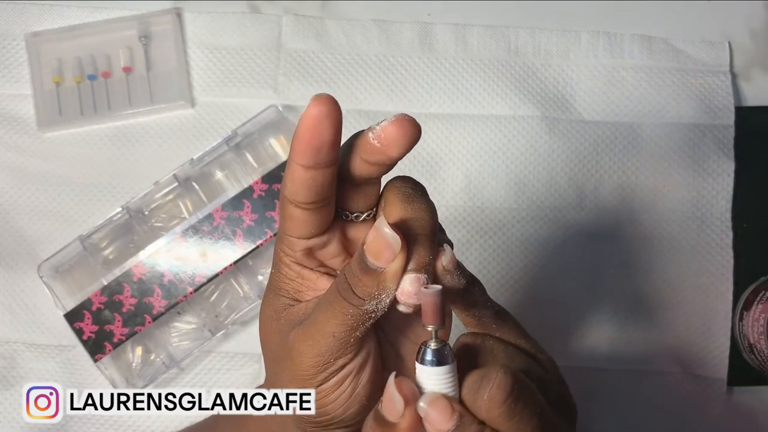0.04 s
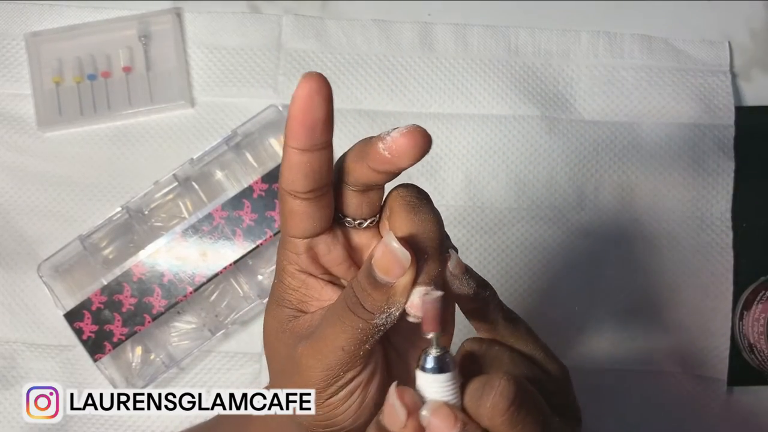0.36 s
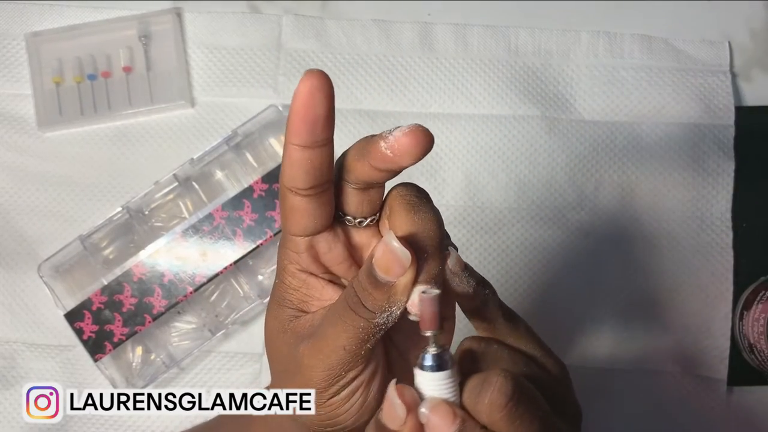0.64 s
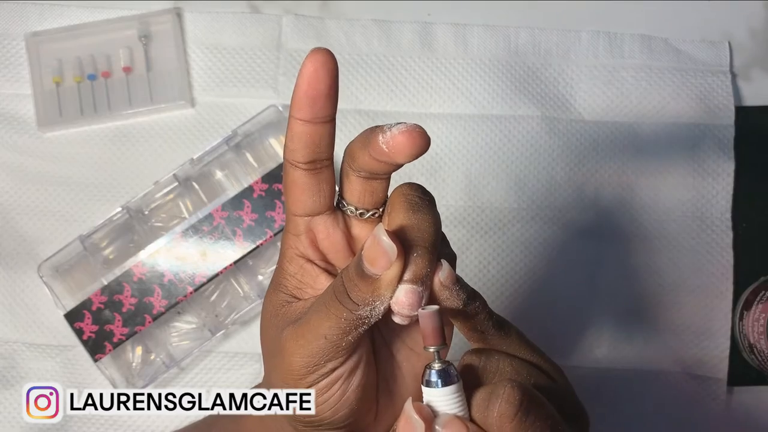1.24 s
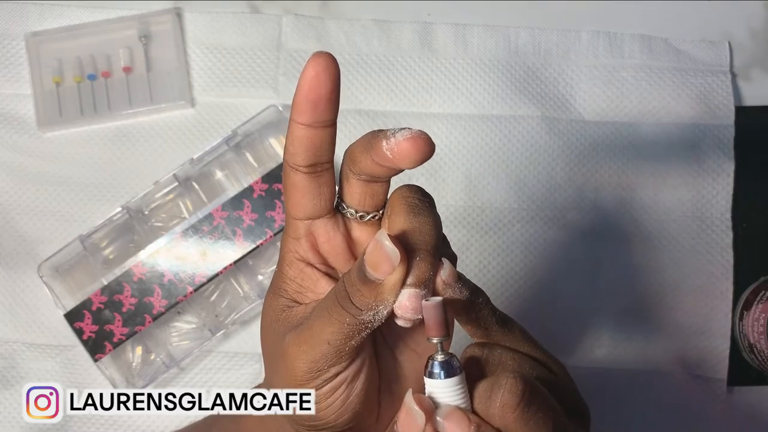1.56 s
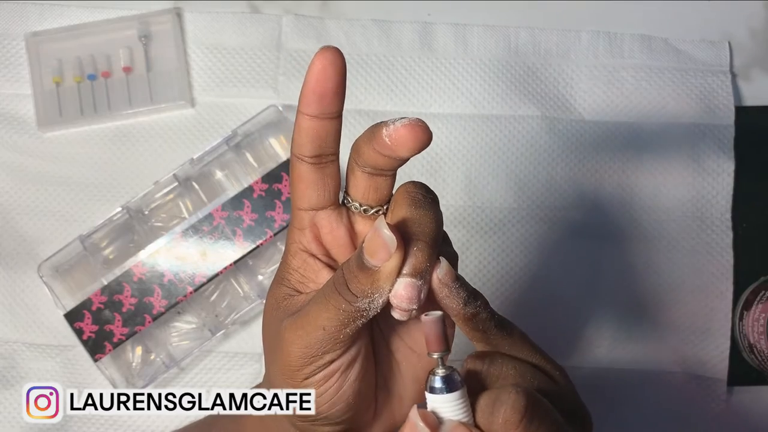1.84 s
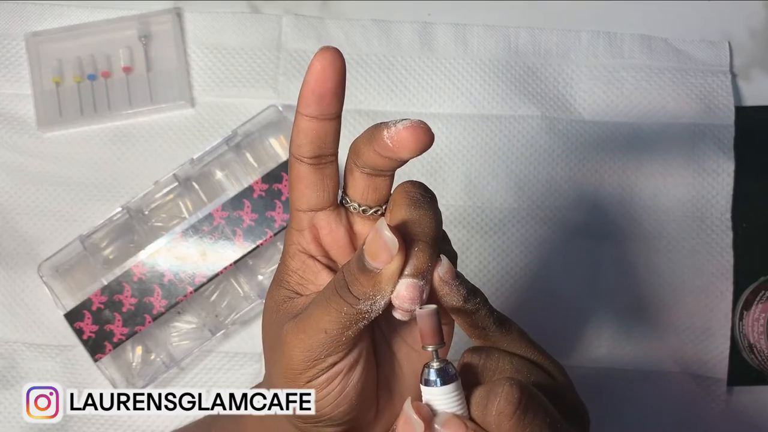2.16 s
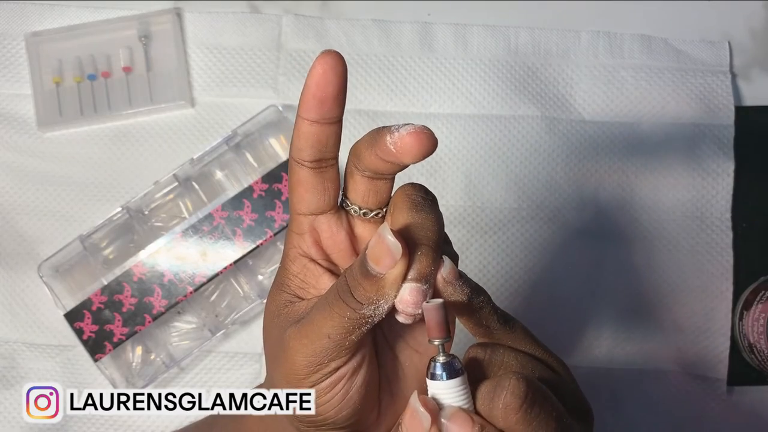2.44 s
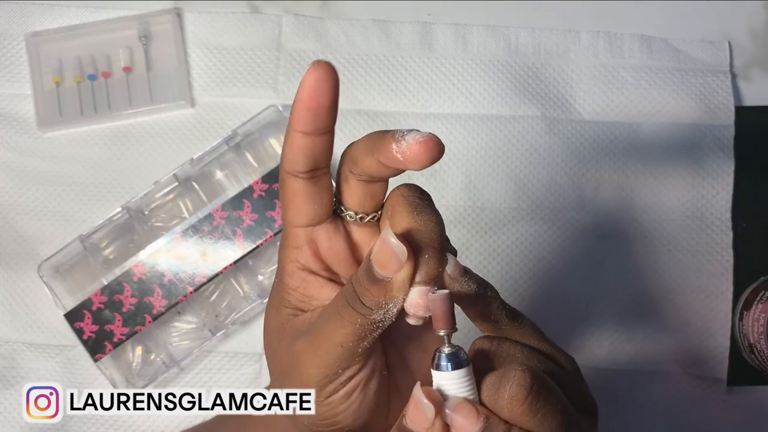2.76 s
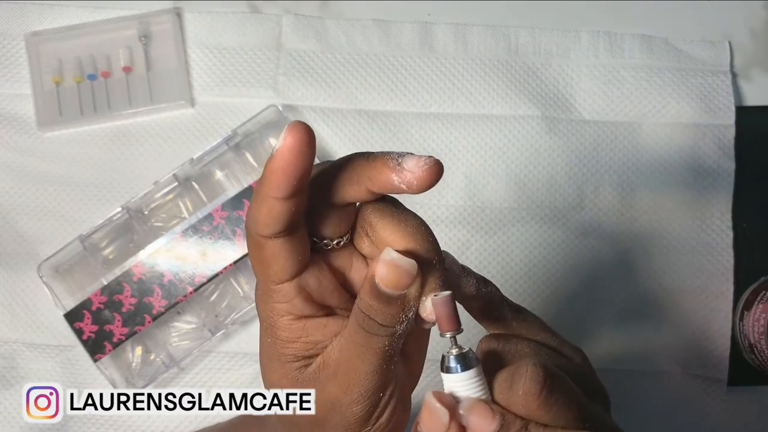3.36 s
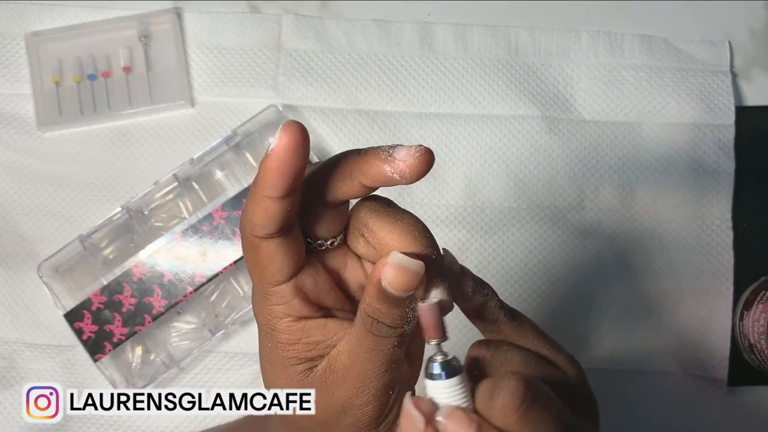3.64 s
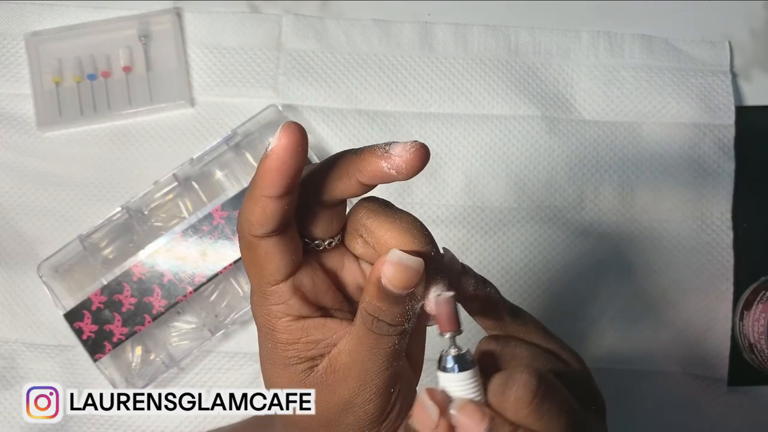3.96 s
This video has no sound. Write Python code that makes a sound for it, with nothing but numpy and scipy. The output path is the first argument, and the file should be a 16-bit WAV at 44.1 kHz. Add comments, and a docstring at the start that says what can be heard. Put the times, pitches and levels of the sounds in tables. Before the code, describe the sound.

A small electric nail drill sands a fingernail close to the microphone. Its rattling whir turns to a hissing rasp in several passes, slowing under load and catching with a few ticks, over a low room hum.

```python
"""A small electric nail drill files a fingernail close to the microphone, in a quiet humming room.
Grains of the sanding band strike the nail at random: the impacts hiss, excite the nail's resonances,
rub dully on the fingertip and, near the end, rasp on the free edge. The motor slows under load, and
now and then the band catches with a tick. With every turn the drive knocks through the handpiece's
housing and the bit rattles in its chuck."""
import sys
import numpy as np
from scipy import signal
from scipy.fft import rfft, irfft
from scipy.io import wavfile

SR = 44100
rng = np.random.default_rng(int(sys.argv[2]) if len(sys.argv) > 2 else 0)


def wav_out(sig):
    """Save sig, one row per channel (or a flat mono array), as 16-bit PCM at SR to the path in sys.argv[1]."""
    wavfile.write(sys.argv[1], SR, np.round(np.clip(np.atleast_2d(sig).T, -1, 1) * 32767).astype(np.int16))


N = 176400
T = np.arange(N) / SR
SIDES = np.array([[1], [-1]])  # left, right

# Hum of machines in the room: f/Hz, level/dB
HUM_TONES = [(26.7, -50), (69.9, -50), (116, -61), (120.3, -61.5), (174, -68.5), (270, -67.5)]
# Spectrum of the room's air noise: f/Hz, relative level/dB
AIR_SPECTRUM = [(18, -7), (40, -3.5), (58, 5.5), (82, -4), (110, -4), (160, -6), (220, -12.5), (340, -8.5),
                (420, -17.5), (600, -16), (900, -21.5), (1300, -25), (15000, -118)]
# Likeness of that noise on the two sides: f/Hz, left-right correlation
AIR_CORRELATION = [(50, .999), (125, 0.99), (250, 0.87), (500, 0.39), (800, 0.043), (1500, 0.077),
                   (8000, 0.29)]
# Left-right phase shift of the recorder's stereo processing, widening the drill: f/Hz, phase/rad
STEREO_PHASE = [(0, 0), (1600, 0), (2600, 1.1), (4000, 1.9), (4700, 3.14), (6870, 6.28), (9020, 9.42),
                (11020, 12.57), (13150, 15.71), (15200, 18.85), (16000, 18.9)]
# Balance of the drill: f/Hz, gain added on the left and taken from the right/dB
DRILL_BALANCE = [(300, 1.8), (800, 0.5), (1500, 0.9), (2700, -1.15), (4000, 0.03), (15000, -0.1)]

# Spindle speed, sagging under load: t/s, rotation frequency/Hz
SPINDLE_SPEED = [(0, 39.6), (.55, 41), (.76, 41.3), (.88, 47), (1.17, 51.5), (1.25, 43.3), (1.66, 39.4),
                 (1.82, 51), (2.05, 52.7), (2.42, 52), (2.6, 44), (3.0, 39.5), (3.25, 47), (3.55, 35.3),
                 (4, 42.4)]
# Work on the nail: t/s, relative grit level/dB, relative nail level/dB, handpiece level/dB
WORK_LEVELS = [(0, -68, -53.5, -58.5), (.08, -59, -52, -63), (.25, -71.5, -57, -53), (.31, -64, -51, -60),
               (.385, -63.5, -57, -89), (.43, -70.5, -52, -75), (.48, -66.5, -57.5, -53),
               (.60, -65.5, -55, -53), (.69, -63, -53, -58), (.81, -72, -59.5, -53),
               (.845, -83.5, -67.5, -60), (1.198, -83, -61.5, -58), (1.207, -61.5, -52.5, -70),
               (1.285, -63, -50, -57), (1.35, -66, -55, -61), (1.47, -63.5, -52.5, -59),
               (1.62, -66.5, -53.5, -60), (1.725, -66.5, -56, -59), (1.77, -84, -63, -57.5),
               (2.0, -79, -64, -57.5), (2.25, -80, -62.5, -57.5), (2.335, -70.5, -58, -55.5),
               (2.43, -83, -68, -60), (2.48, -70, -55, -54), (2.53, -60.5, -57, -55.5),
               (2.62, -67.5, -54, -53.5), (2.74, -65.5, -55, -57), (2.79, -61, -50.5, -58.5),
               (3.0, -66, -52, -55.5), (3.22, -76.5, -58.5, -54), (3.295, -82, -68, -58),
               (3.318, -73, -52, -52), (3.335, -75, -65, -58), (3.362, -79, -59.5, -55.5),
               (3.385, -69.5, -52, -54.5), (3.55, -65.5, -56.5, -57.5), (3.68, -65.5, -53.5, -52.5),
               (3.745, -63, -59, -54), (3.83, -63.5, -54.5, -54.5), (4, -65, -58, -51.5)]
# Response of the handpiece's housing: f/Hz, relative level/dB
HOUSING_SPECTRUM = [(400, -9.5), (1200, -16.5), (1730, -5.5), (2100, -2), (2600, -3), (3050, 5),
                    (3500, 0.5), (4500, -5), (5450, 4), (6700, -1.5), (8500, -18.5), (11200, -32),
                    (14200, -12), (15400, -18)]
# Rattle of the bit in its chuck: t/s, level/dB
CHUCK_LEVELS = [(0, -68), (.22, -63), (.4, -70), (.55, -64), (.95, -68), (1.195, -64), (1.215, -52),
                (1.27, -53), (1.34, -59), (1.85, -66.5), (2.42, -78), (2.52, -61), (2.68, -67), (2.83, -57),
                (3.03, -62.5), (3.22, -54.5), (3.28, -62.5), (3.42, -57.5), (4, -60)]
# Spectrum of that rattle: f/Hz, relative level/dB
CHUCK_SPECTRUM = [(500, -33), (1750, -1), (2500, -23), (3200, 0), (4600, -11), (5600, 6), (6300, 8),
                  (7000, -4), (8000, -15.5), (11000, -19), (15500, -31)]

# Catches of the band on the nail: t/s, relative peak level/dB, crack level re that peak/dB
BAND_CATCHES = [(1.2049, -33, -3), (2.514, -36, -6), (2.533, -32, -4), (2.785, -35, -20),
                (3.311, -33.5, -17), (3.316, -36, -15), (3.373, -38, -20)]
# Spectrum of a catch: f/Hz, relative level/dB
CATCH_SPECTRUM = [(300, -14), (1700, 6), (2600, 2), (5800, 18.5), (7500, 6), (9000, 5.5), (15500, -27)]
# Dull rubbing on the fingertip: t/s, level/dB
FINGERTIP_LEVELS = [(0, -57), (.25, -57), (.45, -62.5), (.62, -58), (.88, -66), (.98, -62), (1.18, -71.5),
                    (1.65, -60), (2.08, -62), (2.3, -78.5), (2.66, -58.5), (3.05, -62), (3.27, -72),
                    (3.42, -62), (4, -61)]
# Spectrum of that rubbing: f/Hz, relative level/dB
FINGERTIP_SPECTRUM = [(200, -15.5), (350, -7), (560, -6), (730, -14), (980, -8), (1300, -14.5),
                      (2500, -25.5), (8000, -67)]
# Shrill rasp on the nail's free edge: t/s, level/dB
EDGE_LEVELS = [(3.45, -94), (3.62, -66), (3.68, -52), (3.71, -60), (3.745, -50.5), (3.79, -67), (3.92, -55),
               (3.95, -47), (4, -47.5)]
# Spectrum of that rasp: f/Hz, relative level/dB
EDGE_SPECTRUM = [(1500, -12), (2700, -6.5), (3700, 1.5), (4600, -15), (7000, -7), (8400, -3), (10500, -4.5),
                 (12000, 0), (15700, -19)]
# Hiss of the abrasive: f/Hz, relative level/dB
GRIT_SPECTRUM = [(500, -7.5), (1200, 6.5), (2400, 0), (3700, 10.5), (4500, -1.5), (6500, 9.5), (7600, -1.5),
                 (8600, 2.5), (10000, 2), (11000, -2), (11900, 5), (14000, -0.5), (15700, 0.5)]
# Resonances of the nail: unshifted f/Hz, bandwidth/Hz, relative level/dB
NAIL_RESONANCES = [(1390, 366, -2.5), (1730, 160, 5), (2080, 136, 0.5), (2940, 460, -11), (3910, 170, -7.5),
                   (5850, 175, -3)]
# Shift of the resonances as the band moves over the nail: t/s, frequency ratio
NAIL_TUNING = [(0, 0.95), (.4, 0.98), (1.3, 0.98), (2.75, 0.999), (3.15, 0.99), (4, .95)]


def from_db(db):
    """Amplitude ratio of a level: a factor of ten per 20 dB."""
    return 10 ** (np.asarray(db) / 20)


def unit_rms(x):
    """Normalisation to unit mean power."""
    return x / np.sqrt(np.mean(x ** 2) + 1e-20)


def in_time(rows):
    """Linear interpolation of each column of a time table at every sample."""
    times, *columns = np.transpose(rows)
    return [np.interp(T, times, column) for column in columns]


def at_hz(points, hz):
    """Interpolation of a spectrum on a logarithmic frequency axis."""
    f, value = np.transpose(points)
    return np.interp(np.log(hz + 1), np.log(f), value)


def drift(corner_hz):
    """Slow random fluctuation: low-pass noise of unit rms."""
    step, settle = 40, 2000  # samples per noise value; values dropped while the filter settles
    r = np.exp(-2 * np.pi * corner_hz * step / SR)
    white = rng.standard_normal(N // step + settle + 2)
    slow = signal.lfilter([1], [1, -2 * r, r * r], white)[settle:]
    return np.interp(np.arange(N) / step, np.arange(len(slow)), unit_rms(slow))


def colour(x, spectrum, size=8192):
    """Minimum-phase filter of unit energy with the given spectrum."""
    magnitude = from_db(at_hz(spectrum, np.fft.rfftfreq(size, 1 / SR)))
    cepstrum = irfft(np.log(magnitude))
    cepstrum[1:size // 2] *= 2  # folding the cepstrum makes the response causal
    cepstrum[size // 2 + 1:] = 0
    response = irfft(np.exp(rfft(cepstrum)))
    return signal.fftconvolve(x, response / np.linalg.norm(response))[:N]


def resonance(x, hz, width_hz, block=256):
    """Damped two-pole resonator with unit peak gain and a moving centre frequency."""
    r = np.exp(-np.pi * width_hz / SR)
    b = np.array([1, 0, -1]) * (1 - r * r) / 2
    state, out = np.zeros(2), np.zeros(N)
    for i in range(0, N, block):
        a = [1, -2 * r * np.cos(2 * np.pi * hz[i] / SR), r * r]
        out[i:i + block], state = signal.lfilter(b, a, x[i:i + block], zi=state)
    return out


def air_noise(level_db=-51.5, leftward_db=0.4):
    """Partial coherence: the room's dull air noise is alike on both sides in the bass."""
    correlation = at_hz(AIR_CORRELATION, np.fft.rfftfreq(N, 1 / SR))
    mid, side = (rfft(colour(white, AIR_SPECTRUM)) for white in rng.standard_normal((2, N)))
    air = irfft(np.sqrt(1 + correlation) * mid + np.sqrt(1 - correlation) * side * SIDES, N)
    return from_db(level_db + leftward_db * SIDES) * unit_rms(air)


def hum_tone(hz, db, waver=0.15):
    """Slow random modulation of amplitude and phase makes a sinusoid waver."""
    amplitude = from_db(db) * np.sqrt(2) * (1 + waver * drift(1.9))
    phase = 2 * np.pi * (hz * T + rng.random()) + waver * drift(1.6)
    return amplitude * np.sin(phase)


def machine_hum(beat_depth=0.48, beat_top_s=0.29, beat_period_s=0.467):
    """Superposition of low machine tones; amplitude modulation gives the clearest a slow beat."""
    beat = 1 + beat_depth * np.cos(2 * np.pi * (T - beat_top_s) / beat_period_s)
    return sum(hum_tone(hz, db) for hz, db in HUM_TONES) + beat * hum_tone(hz=235.5, db=-59)


def stereo_image(direct, scattered, echo_db=-14, t60_s=0.24):
    """Left-right phase shift: the recorder's stereo processing widens the drill and its reflections."""
    t, hz = T[:SR // 4], np.fft.rfftfreq(N, 1 / SR)
    tails = rng.standard_normal((2, len(t))) * from_db(-60 * t / t60_s)
    tails /= np.linalg.norm(tails, axis=1, keepdims=True)
    reflections = from_db(echo_db) * signal.fftconvolve(direct[None], tails, axes=1)[:, :N]
    mid, side = rfft(direct + np.array([scattered, -scattered]) + reflections)
    half_shift = np.interp(hz, *np.transpose(STEREO_PHASE)) / 2
    channels = mid * np.cos(half_shift) + 1j * side * np.sin(half_shift) * SIDES
    return irfft(channels * from_db(at_hz(DRILL_BALANCE, hz) * SIDES), N)


def sample_at(turn, turns):
    """Inverse of the rotation: the sample at which the spindle reaches a given turn."""
    return np.interp(turn, turns, np.arange(N)).astype(int)


def eccentricity(turns, swing_db):
    """Amplitude modulation: the slightly off-centre bit bears harder once in each turn."""
    return from_db(swing_db * np.cos(2 * np.pi * turns))


def handpiece(turns, per_turn=8, jitter=0.082, spread_db=14.5, bearing_db=10):
    """Forced vibration: uneven knocks of the drive and bearing noise sound through the housing."""
    timing, strength = rng.standard_normal((int(turns[-1] * per_turn), 2)).T
    onsets = sample_at((np.arange(len(timing)) + jitter * timing) / per_turn, turns)
    knocks = np.zeros(N)
    knocks[onsets] = from_db(spread_db * np.clip(strength, -2, 2))
    bearings = from_db(bearing_db) * rng.standard_normal(N)
    drive = (unit_rms(knocks) + bearings) * eccentricity(turns, swing_db=2.5)
    return unit_rms(colour(drive, HOUSING_SPECTRUM))


def chuck(turns, per_turn=3, jitter=0.13, spread_db=2.5, rebound_db=-5.5, burst_s=0.00076):
    """Impact and rebound: the bit strikes its chuck once a turn, with weaker bounces between."""
    k = np.arange(int(turns[-1] * per_turn))
    timing, strength = np.clip(rng.standard_normal((len(k), 2)), -1.5, 1.5).T
    onsets = sample_at((k + jitter * timing) / per_turn, turns)
    is_rebound = k % per_turn > 0
    impacts = np.bincount(onsets, from_db(spread_db * strength + rebound_db * is_rebound), N)
    r = np.exp(-1 / (burst_s * SR))
    envelope = signal.lfilter([1], [1, -2 * r, r * r], impacts + 1e-18)
    level_db, = in_time(CHUCK_LEVELS)
    return from_db(level_db) * unit_rms(colour(envelope * rng.standard_normal(N), CHUCK_SPECTRUM))


def catches(gain_db=-5, decay_s=0.0017, crack_hz=9000):
    """Damped transients: the band bites the nail's edge with a snap, some with a bright crack."""
    snap, crack = np.zeros((2, N))
    for onset_s, peak_db, crack_db in BAND_CATCHES:
        envelope = from_db(peak_db + gain_db) * (T >= onset_s) * np.exp(-np.abs(T - onset_s) / decay_s)
        snap += envelope
        crack += envelope * from_db(crack_db)
    highpass = signal.butter(2, crack_hz, "high", fs=SR, output="sos")
    bright = signal.sosfilt(highpass, crack * rng.standard_normal(N))
    return colour(snap * rng.standard_normal(N), CATCH_SPECTRUM) + bright


def coarse_grains(turns, count=60, memory=0.93):
    """Quasi-periodic excitation: the coarsest grains return each turn, their force slowly changing."""
    passes = np.arange(int(turns[-1]) + 1)[:, None] + rng.random(count)
    force = signal.lfilter([1], [1, -memory], rng.standard_normal(passes.shape), axis=0)
    force *= passes < turns[-1]
    return unit_rms(np.bincount(sample_at(passes, turns).ravel(), force.ravel(), N))


def grains(turns, hits_per_s=6000, spread_db=4.5, coarse_db=-4.5, chatter_db=1.94):
    """Shot noise: fine and coarse grains strike the nail, modulated by rotation and contact chatter."""
    hits = rng.random(N) < hits_per_s / SR
    force = from_db(spread_db * np.clip(rng.standard_normal(N), -2, 2)) * rng.choice([-1, 1], N)
    contact = eccentricity(turns, swing_db=1.17) * from_db(chatter_db * drift(21.5))
    impacts = unit_rms(hits * force) + from_db(coarse_db) * coarse_grains(turns)
    return unit_rms(impacts * contact)


def abrasion(turns, spectrum):
    """Source and filter: grain impacts take the colour of the abrasive or of a part of the finger."""
    return unit_rms(colour(grains(turns), spectrum))


def nail_ring(turns, band_hz=(1140, 6540)):
    """Modal superposition: grain impacts excite the nail's resonances, summed in alternating sign."""
    scrape = grains(turns)
    shift, = in_time(NAIL_TUNING)
    ring = sum(from_db(db) * (-1) ** k * resonance(scrape, hz * shift, width_hz)
               for k, (hz, width_hz, db) in enumerate(NAIL_RESONANCES))
    bandpass = signal.butter(2, band_hz, "band", fs=SR, output="sos")
    return unit_rms(signal.sosfilt(bandpass, ring))


def drill(turns, grit_gain_db=9.5, nail_gain_db=-0.5):
    """Superposition of sanding and rattling, all timed by the same rotation."""
    grit_db, nail_db, handpiece_db = in_time(WORK_LEVELS)
    fingertip_db, = in_time(FINGERTIP_LEVELS)
    edge_db, = in_time(EDGE_LEVELS)
    grit = from_db(grit_db + grit_gain_db) * abrasion(turns, GRIT_SPECTRUM)
    nail = from_db(nail_db + nail_gain_db) * nail_ring(turns)
    fingertip = from_db(fingertip_db) * abrasion(turns, FINGERTIP_SPECTRUM)
    edge = from_db(edge_db) * abrasion(turns, EDGE_SPECTRUM)
    rattle = from_db(handpiece_db) * handpiece(turns) + chuck(turns)
    return grit + nail + fingertip + edge + rattle


def scene(speed_wobble=0.008, scatter_db=-17.5):
    """The drill's direct and scattered sound fields add to the room's hum and air noise."""
    speed_hz, = in_time(SPINDLE_SPEED)
    turns = np.cumsum(speed_hz * (1 + speed_wobble * drift(6))) / SR
    room = machine_hum() + air_noise()
    direct = drill(turns) + catches()
    scattered = from_db(scatter_db) * drill(turns)  # same rotation, incoherent with the direct sound
    return room + stereo_image(direct, scattered)


def record(dry):
    """Band limiting: a steep linear-phase low-pass removes the highest treble."""
    lowpass = signal.firwin(401, cutoff=15800, fs=SR, window="blackman")
    return signal.fftconvolve(dry, lowpass[None], "same", axes=1)


dry = scene()
out = record(dry)
wav_out(out)
```